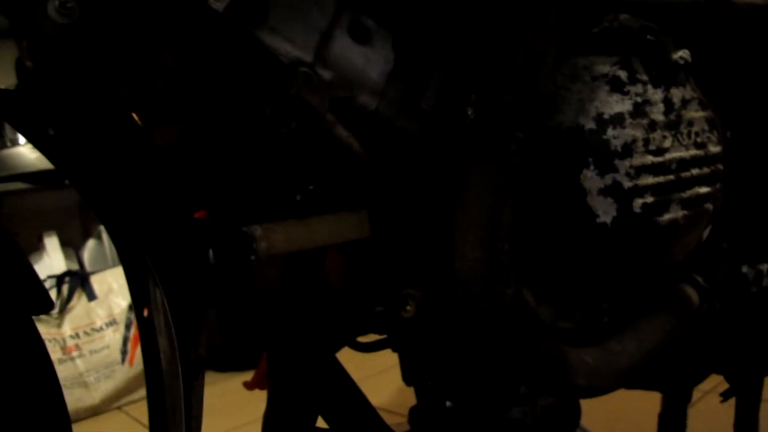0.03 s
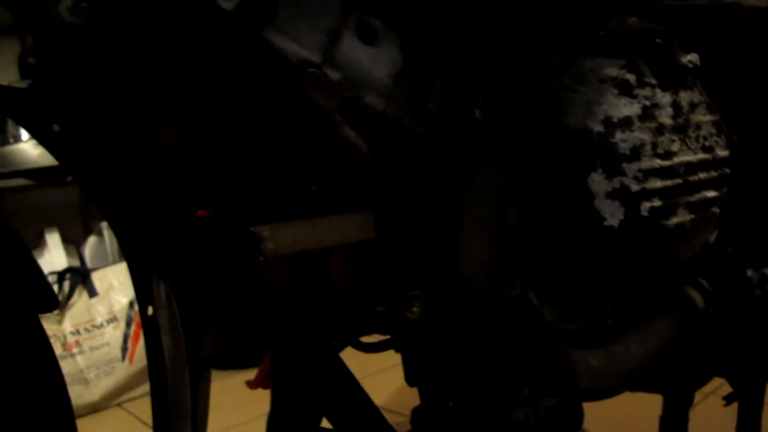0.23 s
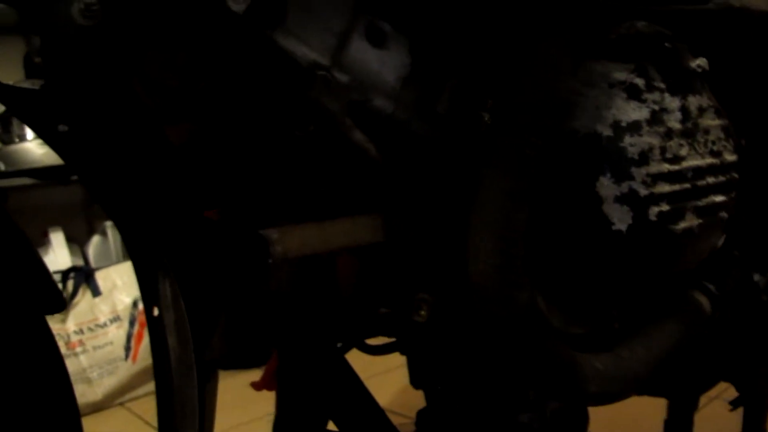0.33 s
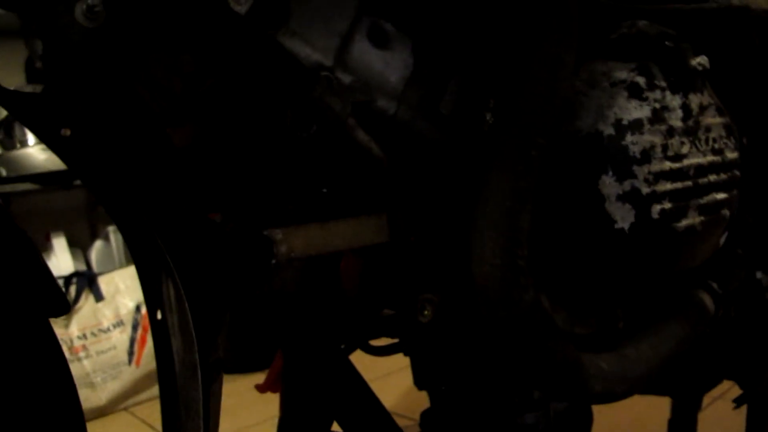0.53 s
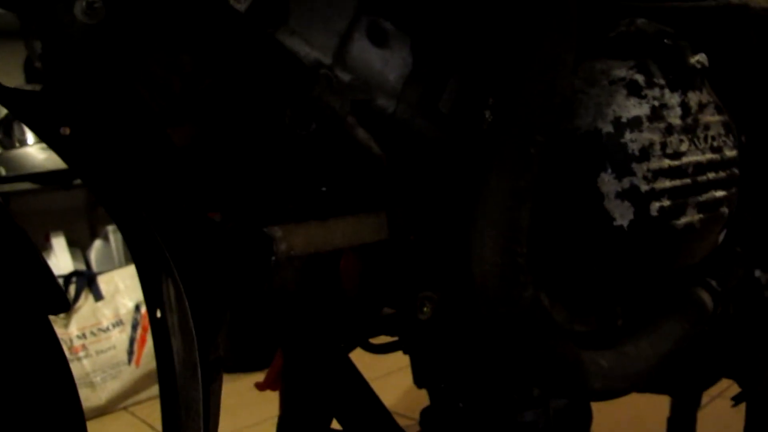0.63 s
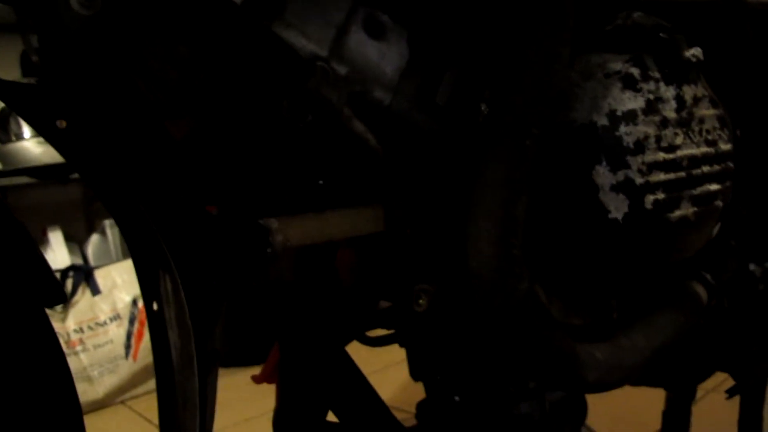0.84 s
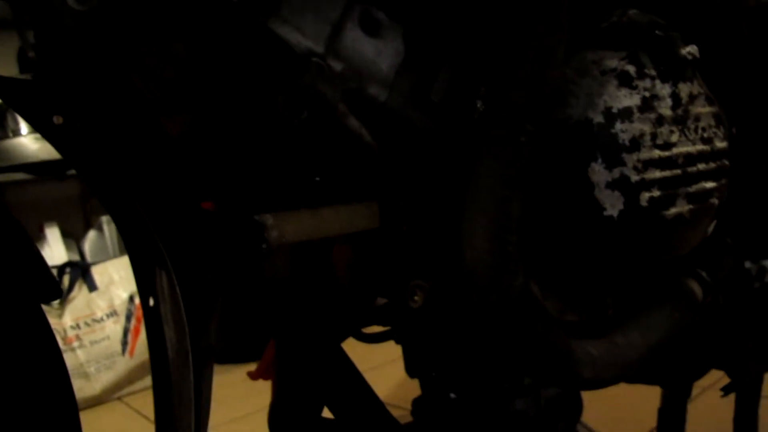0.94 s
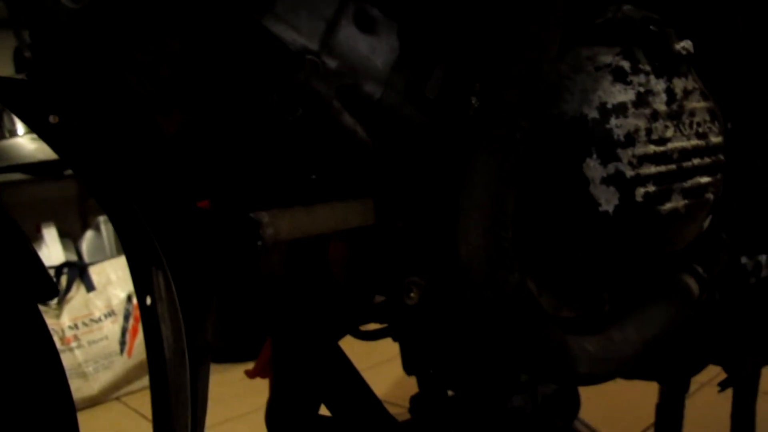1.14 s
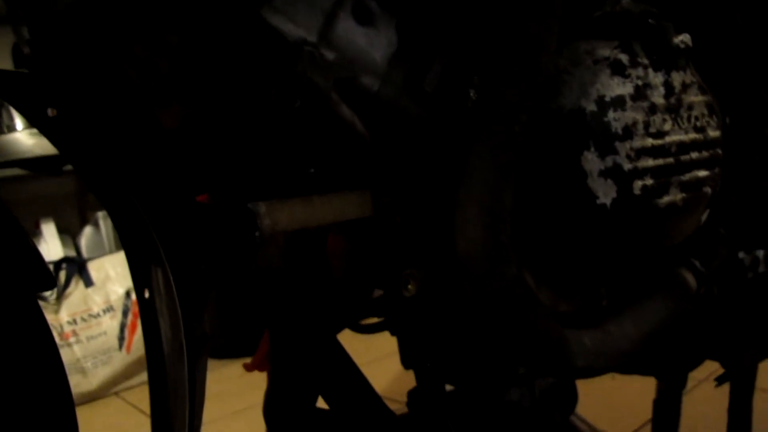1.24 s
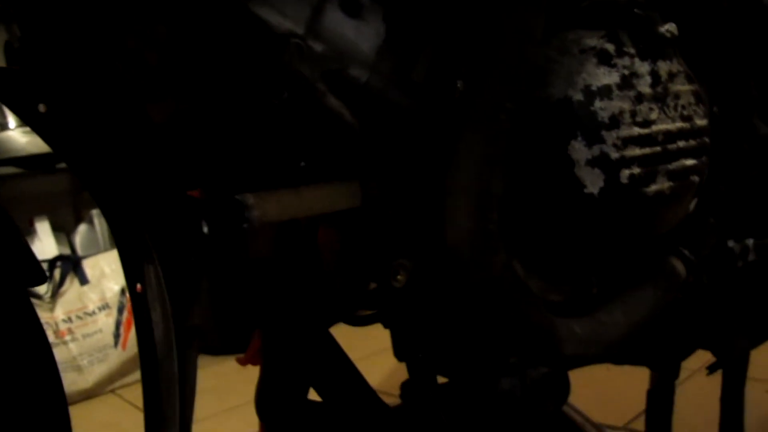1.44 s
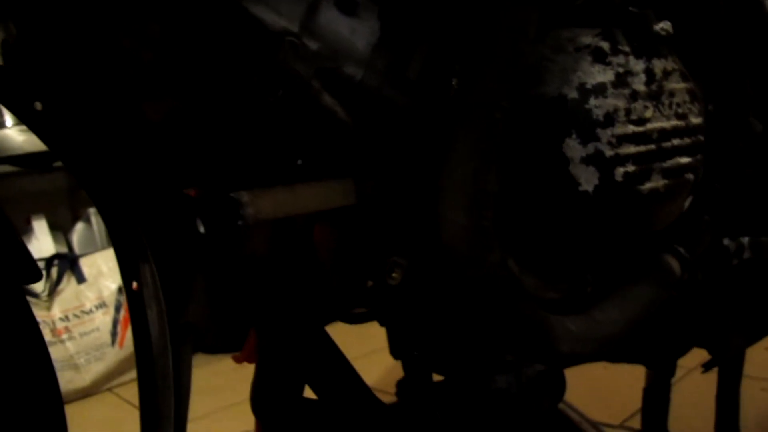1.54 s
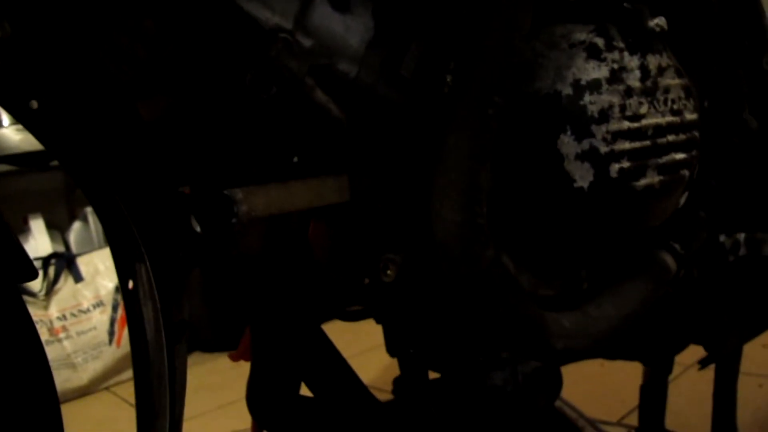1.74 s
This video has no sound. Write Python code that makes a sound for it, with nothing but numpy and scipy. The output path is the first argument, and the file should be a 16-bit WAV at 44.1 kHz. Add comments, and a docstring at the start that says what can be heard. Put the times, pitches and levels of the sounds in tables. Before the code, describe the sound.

Short loud geared-motor whir with gritty grinding, brief indoor ring, then soft hum and faint ticks.

```python
"""Starter motor in a hard-walled workshop

A small motor right of a stereo camera spins up for a third of a second, runs briefly and stops.
Its gear teeth are an impulse train that quickens into a whir, over gated noise and harmonic whine
lines; resonances colour it and decaying noise rings as the room. Shaped noise makes the air and the
fading tail of an earlier clatter, a wavering tone the hum, struck modes a thud and faint ticks."""
import sys
import numpy as np
from scipy import signal
from scipy.fft import rfft, irfft, next_fast_len
from scipy.io import wavfile
from scipy.ndimage import uniform_filter1d, minimum_filter1d

SR = 44100
rng = np.random.default_rng(int(sys.argv[2]) if len(sys.argv) > 2 else 0)


def master(y):
    """Save y as 16-bit WAV."""
    cut = np.clip(np.atleast_2d(y).T, -1, 1)
    pcm = np.round(cut * 32767)  # scale
    wavfile.write(sys.argv[1], SR, pcm.astype(np.int16))


def amplitude_ratio(level_db):
    """Convert a level in decibels to the matching linear amplitude (field) ratio."""
    exponent = np.asarray(level_db, float) / 20
    return 10 ** exponent


N = 79380
T = np.arange(N) / SR
SIZE = next_fast_len(2 * N)
HZ = np.maximum(np.arange(SIZE // 2 + 1) * SR / SIZE, 1)


def at_hz(table):
    """Spectral interpolation: a (f/Hz, value) table read on a logarithmic frequency axis."""
    f, value = np.array(table, float).T
    return np.interp(np.log(HZ), np.log(np.maximum(f, 1)), value)


def curve(table, axis):
    """Envelope interpolation: one column of a time table, sample by sample."""
    table = np.array(table, float)
    return np.interp(T, table[:, 0], table[:, axis])


def shape(x, gain):
    """Linear filtering: convolution is multiplication of spectra."""
    return irfft(rfft(x, SIZE) * gain, SIZE)[..., :N]


def causal(db):
    """Minimum phase: folding the cepstrum of a dB spectrum gives a gain with no pre-echo."""
    cepstrum = irfft(db * np.log(10) / 20, SIZE)
    cepstrum[1:SIZE // 2] *= 2
    cepstrum[SIZE // 2 + 1:] = 0
    return np.exp(rfft(cepstrum))


def resonance(hz, width):
    """Band-pass response of a damped oscillator, with unit gain at its peak."""
    return 1j * HZ * width / (hz ** 2 - HZ ** 2 + 1j * HZ * width)


def high_pass(hz, order):
    """High-pass weighting that halves the amplitude at the corner frequency."""
    return 1 / (1 + (hz / HZ) ** order)


def unit(x):
    """Normalisation to rms 1."""
    return x / np.sqrt(np.mean(x ** 2) + 1e-18)


def walk(rate):
    """Random modulation: noise averaged twice over 1/rate seconds, spread 1."""
    k = int(SR / rate)
    return unit(uniform_filter1d(uniform_filter1d(rng.standard_normal(N), k), k))


def decay(t60, start):
    """Exponential decay: 60 dB lost in t60 seconds, held at 1 before the start."""
    return np.exp(-np.log(1000) * np.maximum(T - start, 0) / t60)


def ring(hz, t60, start):
    """Modal vibration: one sinusoid with exponential decay, struck at start."""
    return np.sin(2 * np.pi * hz * np.maximum(T - start, 0)) * decay(t60, start)


LEFT_LAG_S = 4e-5


def pair(shared, unshared, alike, pan):
    """Interchannel coherence: shared and opposed parts, with a level and a time gap."""
    coherence = np.clip(at_hz(alike), 0, 1) ** .5
    mid, side = np.sqrt((1 + coherence) / 2), np.sqrt((1 - coherence) / 2)
    half = amplitude_ratio(at_hz(pan) / 2)
    lag = np.exp(-2j * np.pi * HZ * LEFT_LAG_S)
    left = shape(shared, mid * half * lag) + shape(unshared, side * half * lag)
    right = shape(shared, mid / half) - shape(unshared, side / half)
    return np.array([left, right])


def noise_pair(colour, alike, pan):
    """Filtered noise: two independent draws of one spectrum form a stereo field of rms 1."""
    a, b = (shape(rng.standard_normal(N), amplitude_ratio(at_hz(colour))) for _ in range(2))
    return unit(pair(a, b, alike, pan))


# Spectrum of the earlier clatter's tail: (f/Hz, relative density/dB)
EARLIER_SPECTRUM = [(120, -60), (200, -10.5), (368, -19.5), (542, -14), (963, -7.5), (1630, -8), (2210, -8),
                    (3850, -16), (6730, -12), (11400, -36), (14800, -54), (22000, -65)]
# Balance of the tail: (f/Hz, left minus right/dB)
EARLIER_BALANCE = [(60, -3.0), (110, -6), (190, -4.0), (340, -2), (610, -0.5), (1080, -7), (1930, -1),
                   (3440, -1.5), (6120, -10), (10900, -12.5)]
# Likeness of left and right, for this tail and the motor: (f/Hz, likeness 0-1)
MOTOR_LIKENESS = [(60, 0.8), (270, 1), (560, .985), (1170, 0.84), (2470, 0.83), (5190, 0), (10900, 0.14)]
EARLIER_DB, EARLIER_T60_S = -33, 0.61


def earlier_clatter():
    """Reverberant decay: a noise tail already dying away exponentially at the start."""
    level = EARLIER_DB - 60 * T / EARLIER_T60_S + 0.5 * walk(60)
    return noise_pair(EARLIER_SPECTRUM, MOTOR_LIKENESS, EARLIER_BALANCE) * amplitude_ratio(level)


# Spectrum of the background air: (f/Hz, relative density/dB)
AIR_SPECTRUM = [(12, -25), (27, -17.5), (40, -8.5), (69, -10), (98, -12), (200, -14), (300, -18.5),
                (400, -22), (963, -22), (2200, -28.5), (3500, -38), (7000, -40.5), (9500, -48),
                (12000, -50.5), (15000, -56), (22000, -58)]
# Likeness of left and right, for air, hum, thud and ticks: (f/Hz, likeness 0-1)
AIR_LIKENESS = [(60, 1), (130, 0.8), (270, 1), (560, 0.76), (1170, 0.74), (2470, 0.19), (5190, 0.018),
                (10900, 0.013)]
# Balance of the same sounds: (f/Hz, left minus right/dB)
AIR_BALANCE = [(60, -3), (110, -4), (190, -1.5), (340, -6), (610, -2), (1080, -4.5), (1930, -2), (3440, -2),
               (6120, -3.5), (10900, -1.0)]
AIR_DB, AIR_WANDER_DB = -47.5, .8  # level before the treble swell
AIR_SWELL_DB_PER_S, TREBLE_SWELL_DB_PER_S = 2.5, 3  # the treble swell adds to the first


def air():
    """Stationary noise slowly modulated: a soft background that swells, its treble most."""
    level = AIR_DB + AIR_WANDER_DB * walk(9) + AIR_SWELL_DB_PER_S * (T - 1)
    noise = noise_pair(AIR_SPECTRUM, AIR_LIKENESS, AIR_BALANCE) * amplitude_ratio(level)
    treble = shape(noise, high_pass(6000, 4))
    return noise + treble * (amplitude_ratio(TREBLE_SWELL_DB_PER_S * (T - 1)) - 1)


# Level of the hum's fundamental: (t/s, level/dB)
HUM_LEVEL = [(0.62, -55.5), (0.786, -47), (0.868, -42.5), (0.904, -48), (0.95, -46.5), (0.984, -54),
             (1.014, -47.5), (1.168, -45.5), (1.336, -46), (1.382, -61), (1.48, -46.5), (1.526, -55),
             (1.576, -42.5), (1.634, -49), (1.688, -42.5), (1.734, -43.5), (1.77, -43.5), (1.8, -42)]
# Overtones relative to the fundamental: (multiple, mean level/dB)
HUM_PARTIALS = [(2, -19), (3, -16.5), (4, -18)]
HUM_HZ, HUM_FLUTTER_DB = 70.9, 3  # mean pitch; spread of the overtone levels


def hum():
    """Harmonic series with frequency modulation: a wavering low tone and weak overtones."""
    phase = 2 * np.pi * np.cumsum(HUM_HZ * (1 + 0.0211 * walk(6.78))) / SR
    tone = np.sin(phase)
    for k, db in HUM_PARTIALS:
        tone = tone + amplitude_ratio(db + HUM_FLUTTER_DB * walk(7.7)) * np.sin(k * phase + k)
    return np.sqrt(2) * tone * amplitude_ratio(curve(HUM_LEVEL, axis=1))


# Run-up of the gear: (t/s, mean tooth knocks per s)
KNOCK_RATE = [(.147, 46), (.2, 116), (.235, 178), (.25, 221), (.274, 272), (.296, 319), (.318, 358),
              (.34, 382), (.362, 407), (.384, 420), (.422, 431), (.444, 450), (.468, 432), (.485, 436),
              (.52, 449), (.6, 447)]
START_S = .1473  # first tooth knock


def gear_rotation():
    """Rotational kinematics: phase, in tooth spacings, is the integral of the tooth rate."""
    rate = curve(KNOCK_RATE, axis=1) * (1 + .004 * walk(40)) * (T >= START_S)
    return rate, np.cumsum(rate) / SR


KNOCK_SCATTER_DB, KNOCK_JITTER = 4, 0.029  # jitter in tooth spacings, reached over 25 knocks
KNOCK_RATTLE_S = 0.0029  # time constant of the short rattle in each knock


def tooth_knocks(rate, phase):
    """Impulse train: uneven impacts at whole phases, and the rattle envelope each excites."""
    chance = rng.standard_normal((400, 2))
    turns = np.arange(400)
    jitter = KNOCK_JITTER * chance[:, 0] * np.minimum(turns / 25, 1)
    when = np.interp(turns + jitter, phase, T) * SR
    when[0] = START_S * SR
    keep = when < .62 * SR
    whole, part = when[keep].astype(int), when[keep] % 1
    size = amplitude_ratio(KNOCK_SCATTER_DB * chance[keep, 1])
    # each impulse is shared between two samples to place it exactly
    knocks = np.zeros(N + 1)
    np.add.at(knocks, whole, size * (1 - part))
    np.add.at(knocks, whole + 1, size * part)
    knocks = knocks[:N] * np.sqrt(SR / np.maximum(rate, 40))  # equal power at any rate
    rattle = signal.lfilter([1], [1, -np.exp(-1 / (KNOCK_RATTLE_S * SR))], knocks)
    rattle = uniform_filter1d(rattle, size=16) * np.sqrt(2 / (KNOCK_RATTLE_S * SR))
    return knocks, rattle


def grinding(phase):
    """Amplitude-modulated noise: friction that surges at each tooth contact, rms 1."""
    gate = 0.24 + np.exp(-(phase % 1) / 0.41)
    return unit(gate * amplitude_ratio(1.83 * walk(140)) * rng.standard_normal(N))


# Whine lines: (multiple of the knock rate, relative level/dB)
WHINE_LINES = [(2, -13), (3, 0), (4, -8), (5, -7), (6, -13), (7, -10), (8, -13), (9, -17)]
# Whine over the motor level: (t/s, level/dB)
WHINE_OVER_MOTOR = [(.23, -4), (.27, -5), (.33, -12.5), (.36, 0.5), (.46, 2.5), (.5, -6), (.56, -8)]
WHINE_FLUTTER_DB, WHINE_WOBBLE_TURNS = 2, .018  # wobble in tooth spacings


def gear_whine(rate, phase):
    """Order spectrum: harmonics locked to the tooth rate, fluttering in level and phase."""
    whine = 0
    for k, db in WHINE_LINES:
        level = amplitude_ratio(db + WHINE_FLUTTER_DB * walk(45))
        wobbling = phase + WHINE_WOBBLE_TURNS * walk(67)
        whine = whine + level * np.cos(2 * np.pi * k * wobbling)
    whine = whine * amplitude_ratio(curve(WHINE_OVER_MOTOR, axis=1)) * (rate > 0)
    return shape(whine, high_pass(660, 8))


# Modes of the casing: (f/Hz, width/Hz, relative level/dB)
CASING_MODES = [(760, 38, -6.5), (1281, 132, -1.5), (1734, 10.7, -8), (2063, 47, 9.5), (3237, 33, 6),
                (3250, 29, -8), (4255, 143, -13), (6200, 79, 0.5), (7010, 31, -30.5), (7120, 210, -19),
                (7760, 22, -9), (8540, 120, -15), (8540, 110, -9), (9150, 110, -5)]
# Broad spectrum of the motor: (f/Hz, relative density/dB)
MOTOR_SPECTRUM = [(88, -63), (150, -55), (183, -29.5), (258, -20), (340, -18), (496, -23), (650, -16.5),
                  (725, -10.5), (885, -11), (1320, 1), (2770, -7.5), (3140, -8.5), (4770, -20),
                  (6200, -16.5), (7360, -17), (8820, -26), (11300, -39.5), (12100, -62), (13500, -73),
                  (14500, -49), (15500, -83), (22000, -104)]
CASING_DB = -1


def casing_colour():
    """Modal superposition: casing resonances of alternating sign on a minimum-phase colour."""
    body = 0
    for k, (f, width, db) in enumerate(CASING_MODES):
        body = body + amplitude_ratio(db) * resonance(f, width) * (-1) ** k
    tops = at_hz([(f, db) for f, width, db in CASING_MODES])
    colour = causal(at_hz(MOTOR_SPECTRUM)) * (1 + amplitude_ratio(CASING_DB) * 2 * body / amplitude_ratio(tops))
    return colour / np.sqrt(np.mean(np.abs(colour) ** 2))


# Effort of the motor: (t/s, level/dB, grinding share/dB, treble gain/dB)
MOTOR_EFFORT = [(.14, -50, -4, 6), (.16, -36, 3, -18), (.18, -38.5, 8, 0), (.2, -29.5, -18, 0),
                (.22, -27.5, 1.5, -3.5), (.25, -19, 4, -3.5), (.29, -19.5, 7, -3), (.32, -18.5, 5, 2.5),
                (.36, -20, 5.5, -0.5), (.39, -25, -2, 6.5), (.43, -20, -6.5, 5), (.47, -25, 8, 4.5),
                (.49, -18.5, -3.5, -1.5), (.51, -25, 5.5, -4.5), (.53, -26.5, 0.5, -4), (.57, -42, -5, -19)]
KNOCK_DB, GRIND_DB = -5.5, -5.5  # shares; the grinding share of the table adds to the second


def motor():
    """Source-filter principle: knocks and grinding excite the casing, whine lines join them."""
    rate, phase = gear_rotation()
    knocks, rattle = tooth_knocks(rate, phase)
    whine = gear_whine(rate, phase)
    colour = casing_colour()
    both = []
    for _ in range(2):
        grind = grinding(phase) * amplitude_ratio(GRIND_DB + curve(MOTOR_EFFORT, axis=2))
        impacts = amplitude_ratio(KNOCK_DB) * (0.13 * knocks + rattle * rng.standard_normal(N))
        x = shape((impacts + grind) * (rate > 0), colour)
        x = x + shape(x, high_pass(4800, 8)) * (amplitude_ratio(curve(MOTOR_EFFORT, axis=3)) - 1)
        stop = np.clip((.6 - T) / .03, 0, 1)
        both.append((x + whine) * amplitude_ratio(curve(MOTOR_EFFORT, axis=1)) * stop)
    # a short noise burst smears the unshared part
    smear = rng.standard_normal(128) * np.exp(-np.arange(128) / 30)
    return both[0], shape(both[1], rfft(smear / np.sqrt(np.sum(smear ** 2)), SIZE))


PANEL_HZ, PANEL_WIDTH_HZ, PANEL_DB = 1362, 14, 0


def panel(x):
    """Sympathetic resonance: a panel nearby rings along in one narrow mode."""
    return shape(x, amplitude_ratio(PANEL_DB) * resonance(PANEL_HZ, PANEL_WIDTH_HZ))


# Reverberation time of the room: (f/Hz, t60/s)
ROOM_DECAY = [(200, 0.51), (1300, 0.58), (3000, 0.44), (7000, 0.51), (12000, 0.29)]


def room(x):
    """Diffuse reverberation: convolution with noise that decays at its own rate per octave."""
    tail = 0
    noise = rfft(rng.standard_normal(N), SIZE)
    t60 = at_hz(ROOM_DECAY)
    for octave in range(5, 15):
        band = np.maximum(1 - np.abs(np.log2(HZ) - octave), 0)
        band_t60 = t60[np.searchsorted(HZ, 2. ** octave)]
        tail = tail + irfft(noise * band, SIZE)[:N] * decay(band_t60, 0)
    tail = tail * np.minimum(T / 0.011, 1)  # echoes build up over 11 ms
    return shape(x, rfft(tail / np.sqrt(np.sum(tail ** 2)), SIZE))


# Balance of the motor: (f/Hz, left minus right/dB)
MOTOR_BALANCE = [(60, 1), (110, -1), (190, 4), (340, -5), (610, -3), (1080, -6.5), (1930, -2.5), (3440, -5),
                 (6120, -13), (10900, -20)]
ROOM_DB = -7


def motor_in_room():
    """Direct and reverberant fields: the near motor plus the walls' more centred answer."""
    a, b = motor()
    near = pair(a, b, MOTOR_LIKENESS, MOTOR_BALANCE)
    far_balance = [(f, 0.74 * db) for f, db in MOTOR_BALANCE]
    far = pair(room(a + panel(a)), room(b), MOTOR_LIKENESS, far_balance)
    return near + amplitude_ratio(ROOM_DB) * far


# Modes of the thud: (f/Hz, relative level/dB, t60/s)
THUD_MODES = [(28.6, -12, 0.8), (76, -5, 0.49), (100.9, -4.5, 0.76), (259, -7.5, 0.26)]
THUD_S, THUD_DB, THUD_RISE_S = .428, -30.5, .006


def thud():
    """Modal impact: a few low modes struck together with a soft onset."""
    modes = sum(amplitude_ratio(db) * ring(f, t60, THUD_S) for f, db, t60 in THUD_MODES)
    return amplitude_ratio(THUD_DB) * modes * np.clip((T - THUD_S) / THUD_RISE_S, 0, 1)


# Faint ticks: (t/s, relative level/dB, f/Hz, t60 of the crackle/s)
TICK_EVENTS = [(1.2594, -46.5, 3700, 0.059), (1.2894, -46, 2300, .05), (1.4656, -45.5, 4550, 0.075),
               (1.6174, -34.5, 2600, 0.041), (1.618, -49, 4650, .06)]
TICK_CRACKLE, TICK_RING, TICK_RING_SHARE = .4, 1.1, .16  # two gains; ring t60 over crackle t60


def faint_ticks():
    """Impact transients: each tick is a decaying band of noise and a shorter modal ring."""
    ticks = 0
    for s, db, hz, t60 in TICK_EVENTS:
        band = 1 / (1 + (2.0 * (HZ / hz - hz / HZ)) ** 2)
        band = band + 0.043 * (HZ > hz) / (1 + (HZ / 8000) ** 6)
        crackle = unit(shape(rng.standard_normal(N), band))
        crackle = crackle * (T >= s) * decay(t60, s) * amplitude_ratio(3.0 * walk(370))
        mode = ring(hz, t60 * TICK_RING_SHARE, s)
        ticks = ticks + amplitude_ratio(db) * (TICK_CRACKLE * crackle + TICK_RING * mode)
    shared = ticks + amplitude_ratio(-10.5) * room(ticks)
    return pair(shared, amplitude_ratio(-10) * room(ticks), AIR_LIKENESS, AIR_BALANCE)


def scene():
    """Superposition: the motor in its room, the low sounds and the ticks over the background."""
    low = pair(hum() + thud(), 0 * T, AIR_LIKENESS, AIR_BALANCE)
    return earlier_clatter() + air() + low + motor_in_room() + faint_ticks()


def top_cut(x):
    """Nothing passes above the cut-off."""
    return signal.sosfilt(signal.butter(12, 15720, fs=SR, output="sos"), x)


def record(dry):
    """Peak limiting: a smoothed look-ahead gain holds peaks under the camera's ceiling."""
    ceiling, span = .78, int(.003 * SR)  # full scale 1; 3 ms in samples
    allowed = np.minimum(ceiling / (np.abs(dry).max(axis=0) + 1e-9), 1)
    gain = uniform_filter1d(minimum_filter1d(allowed, 2 * span), span)
    return top_cut(dry * gain)


dry = scene()
out = record(dry)
master(out)
```